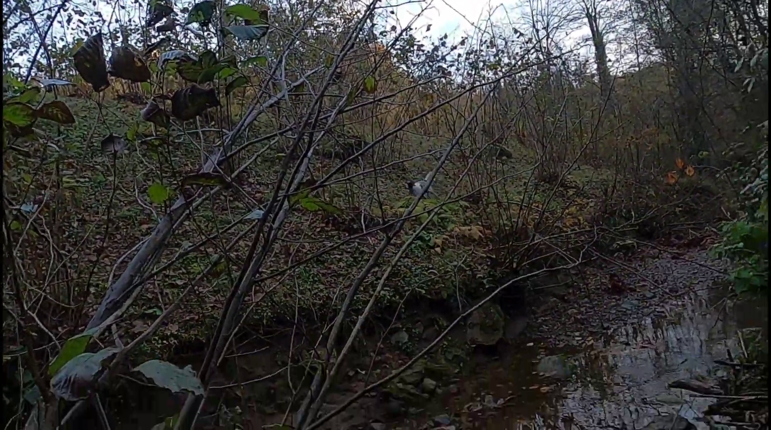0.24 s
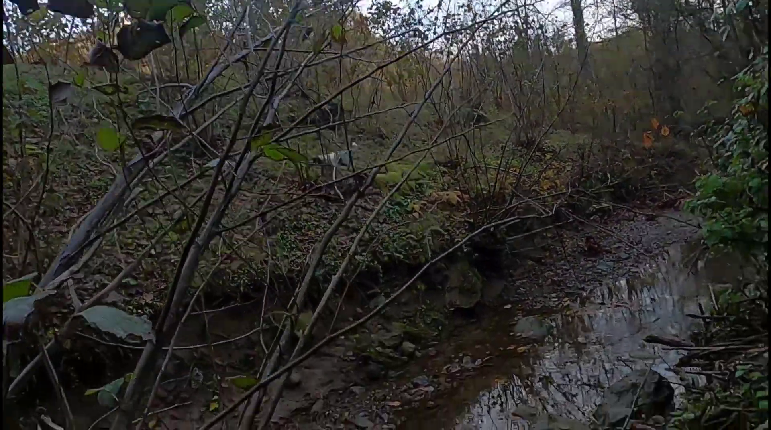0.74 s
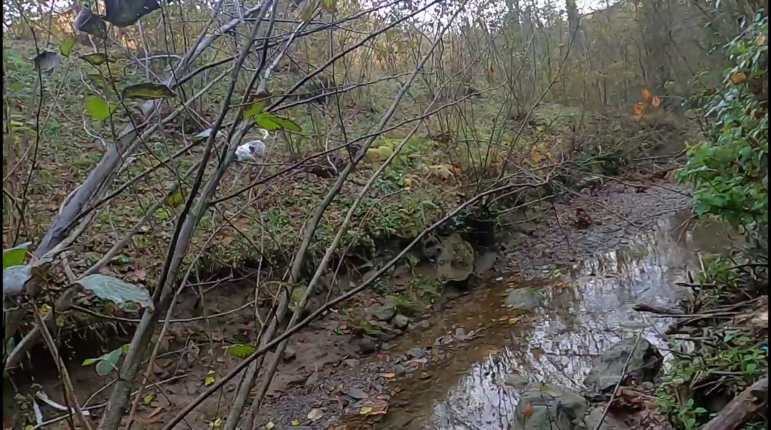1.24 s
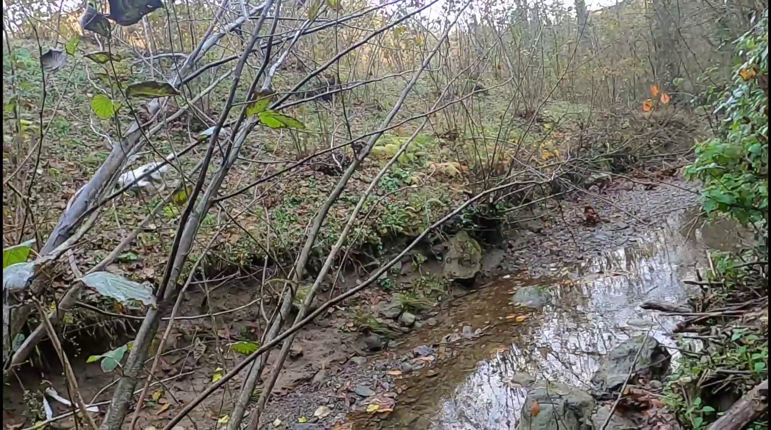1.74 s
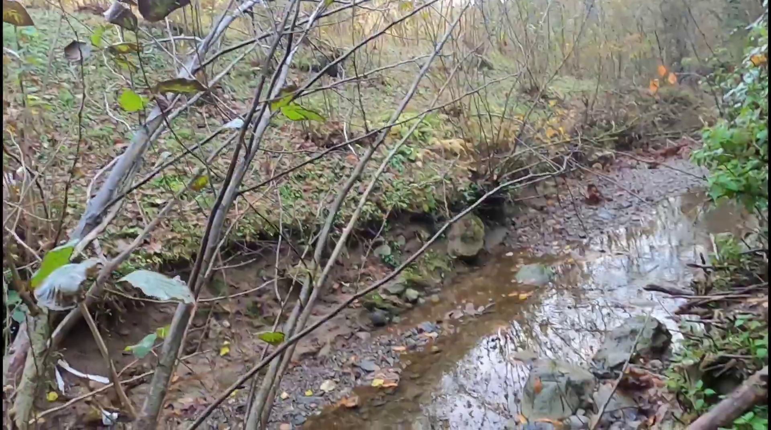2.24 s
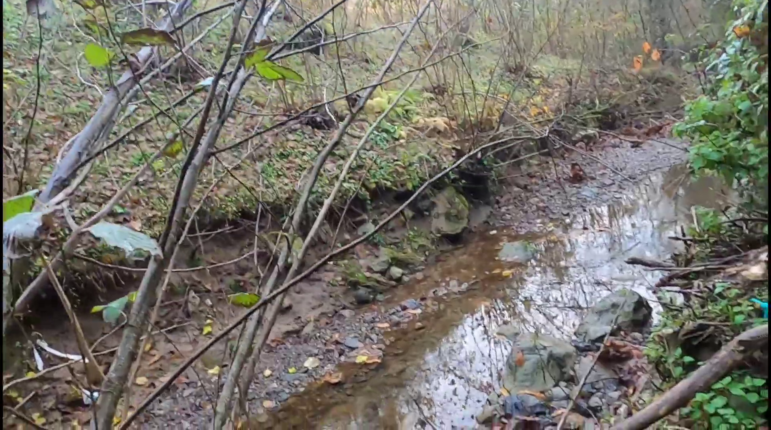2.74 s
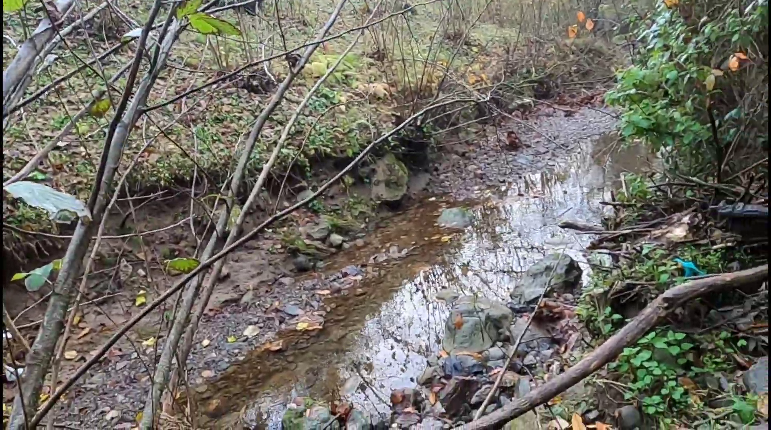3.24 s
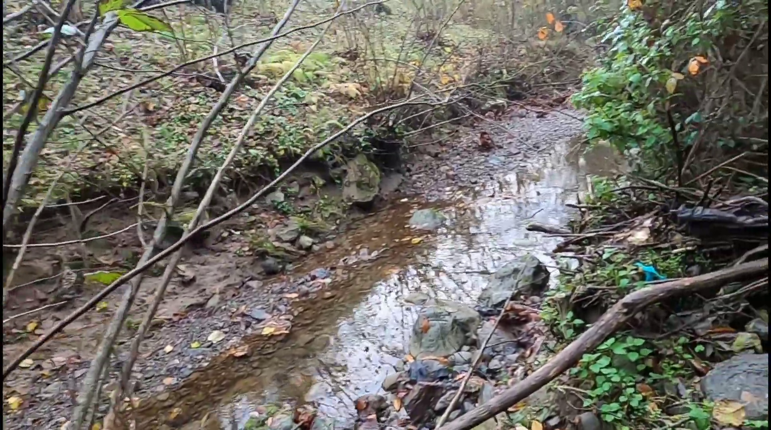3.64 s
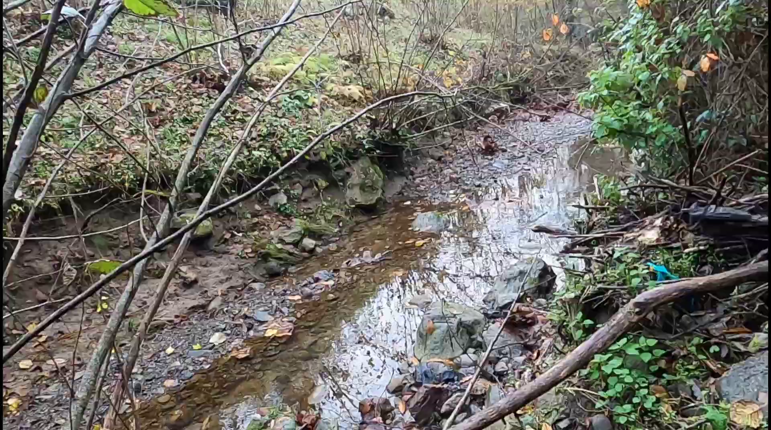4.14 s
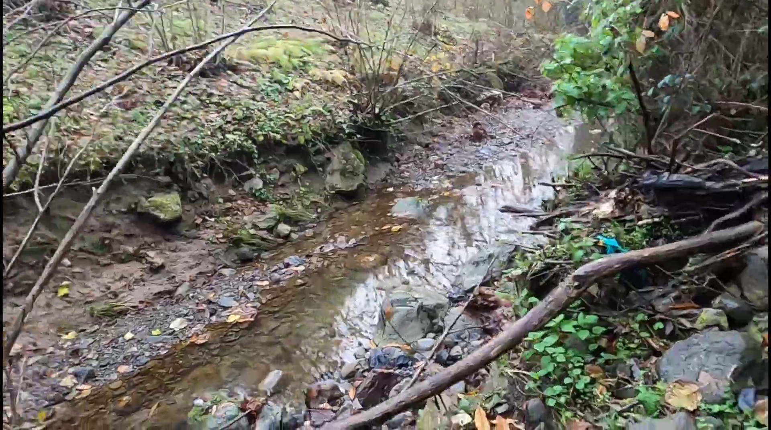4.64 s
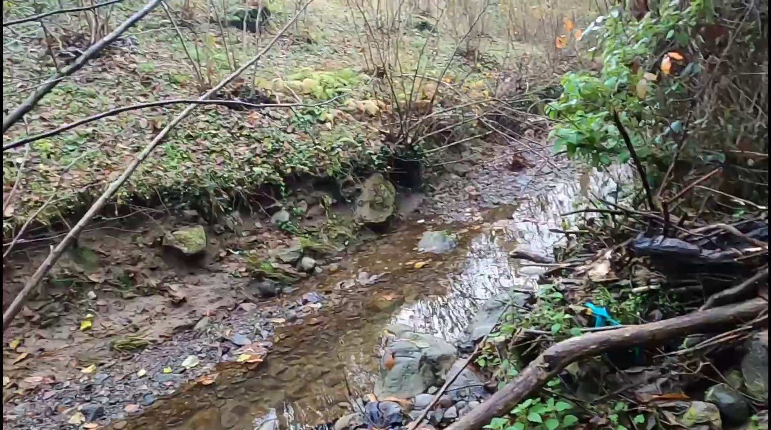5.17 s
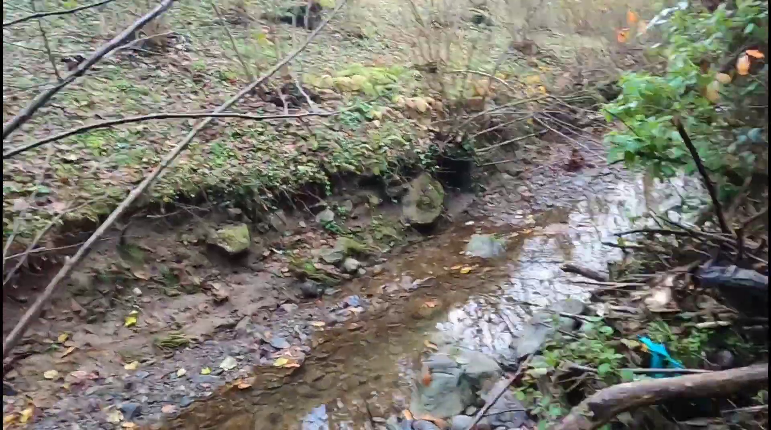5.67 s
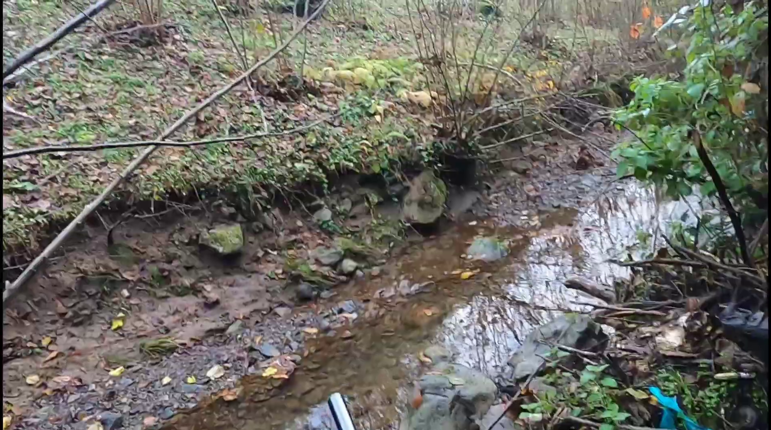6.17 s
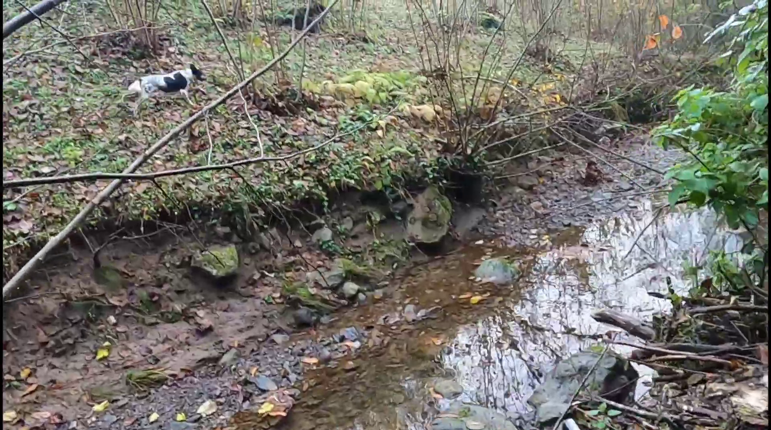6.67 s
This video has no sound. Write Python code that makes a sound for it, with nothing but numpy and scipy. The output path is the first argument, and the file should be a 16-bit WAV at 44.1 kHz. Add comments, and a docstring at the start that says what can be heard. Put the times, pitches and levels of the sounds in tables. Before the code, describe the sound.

In quiet woods, boots break twigs and crush dry leaves right by the microphone. The sharp cracks come in clusters and are thickest around the middle, where a low thump and a microphone jolt land. After that come muffled thuds on soft earth, brushed leaves, a few small snaps and one short woody knock. A soft far-off rustle and low forest murmur lie underneath, with a few very faint peeps.

```python
"""Footsteps in forest undergrowth

Close to a small camera's stereo microphone, twigs snap, dry leaves crush under boots and soles thud on
soft earth. Jolts rumble in the camera body, a metal fitting clinks, leaves swish aside and a hollow
branch is knocked. Farther off are rustling leaves, a low forest murmur and a few faint peeps.
The camera turns its gain down after loud crunches."""
import sys
import numpy as np
from scipy import signal
from scipy.fft import rfft, irfft, next_fast_len
from scipy.io import wavfile
from scipy.ndimage import uniform_filter1d, map_coordinates

SR = 44100
rng = np.random.default_rng(int(sys.argv[2]) if len(sys.argv) > 2 else 0)


def inscribe(sig):
    """Save sig as 16-bit PCM at rate SR to the path in sys.argv[1].

    A 1-D sig is mono; a 2-D sig holds one channel per row.
    Samples are clipped to [-1, 1] before scaling.
    """
    pcm = np.round(np.clip(np.atleast_2d(sig).T, -1, 1) * 32767)
    wavfile.write(sys.argv[1], SR, pcm.astype(np.int16))


N = 304652


def amp(db):
    return 10 ** (np.asarray(db) / 20)


def unit(x):
    return x / np.sqrt(np.mean(x ** 2) + 1e-20)


def along(points, hz):
    """Read (frequency, value) points on a log frequency axis."""
    freqs, values = np.transpose(points)
    return np.interp(np.log(hz + 1), np.log(freqs + 1), values)


def curves(rows):
    """One value per sample for each column after the time."""
    times, *columns = np.transpose(rows)
    return [np.interp(np.arange(N) / SR, times, column) for column in columns]


def wobble(rate):
    """A smooth random curve, rate knots a second."""
    return map_coordinates(rng.standard_normal(int(N * rate / SR) + 4), [np.arange(N) * rate / SR])


def filtered(x, response):
    """x through a complex response of frequency."""
    n = x.shape[-1]
    padded = next_fast_len(n + 4096)
    return irfft(rfft(x, padded) * response(np.fft.rfftfreq(padded, 1 / SR)), padded)[..., :n]


def mode(hz, q):
    """One causal resonance."""
    return lambda f: 1j * f * hz / q / (hz * hz - f * f + 1j * f * hz / q)


def panned(x, db):
    return x * amp([db / 2, -db / 2]).reshape(2, -1)


def unit_peak(x):
    """x scaled so that its envelope tops out at 1."""
    return x / np.sqrt(2 * np.max(uniform_filter1d(x ** 2, size=40)))


def far_noise(spectrum, patchy_db):
    """Distant stereo noise of rms 1, with patches of random gain in time and pitch."""
    # far sound at the microphone: (frequency [Hz], left-right likeness [-1 to 1])
    likeness = [(60, 0.28), (180, 0.95), (540, 0.84), (1630, 0.41), (4900, 0.28), (14700, -0.37)]
    bins = signal.stft(rng.standard_normal((2, N)), nperseg=512)[2]
    patches = uniform_filter1d(uniform_filter1d(rng.standard_normal(bins.shape[1:]), 6, 0), 10, 1)
    pair = signal.istft(bins * amp(patchy_db * unit(patches)), nperseg=512)[1][:, :N]
    width = lambda f: np.arccos(np.clip(along(likeness, f), -1, 1)) / 2
    mid, side = filtered(pair, lambda f: amp(along(spectrum, f)) * [np.cos(width(f)), np.sin(width(f))])
    return unit(np.array([mid + side, mid - side]))


def woods():
    """Far off and to the left, leaves rustle in uneven patches over a low murmur."""
    # the distant forest: (time [s], rustle [dB], murmur [dB], rustle left-right [dB])
    levels = [(0.0, -49.5, -59, 7), (0.45, -44.5, -56.5, 3.5), (0.73, -50, -63, 6.5), (1.0, -47.5, -57, 6),
              (1.33, -51.5, -61.5, 4), (1.61, -47.5, -51, 1.5), (2.27, -50.5, -65, 7.5),
              (2.62, -49.5, -58.5, 6), (3.71, -52, -63.5, 7.5), (4.64, -51, -60.5, 5.5),
              (4.98, -47.5, -46, 5.5), (5.23, -49, -60.5, 6), (5.77, -48.5, -54.5, 5.5),
              (6.4, -44.5, -57, 2.5), (6.91, -44.5, -53, 5)]
    # spectra of rustle and murmur: (frequency [Hz], density [dB])
    rustle_spectrum = [(240, -26.5), (400, -10.5), (495, -13), (830, -7.5), (1030, -3.5), (1550, -5),
                       (2940, -10), (3170, -11.5), (5240, -18.5), (9920, -32), (13000, -44), (15200, -48)]
    murmur_spectrum = [(53, -67), (90, -73), (146, -0.5), (227, 5.5), (324, 3.5), (357, -3.5), (491, 1),
                       (900, -15), (1170, -23), (1980, -120)]
    rustle_db, murmur_db, pan_db = curves(levels)
    stir_db, swell_db = wobble(14) + wobble(70) + wobble(400), 2 * wobble(18)
    rustle = amp(rustle_db + stir_db) * far_noise(rustle_spectrum, patchy_db=1.5)
    murmur = amp(murmur_db + swell_db) * far_noise(murmur_spectrum, patchy_db=0.5)
    return panned(rustle, pan_db) + murmur


def leaf_ticks():
    """Single dry leaves nearby tick faintly at random."""
    ticks_per_s, spread_db = 30, 14
    chance, softness = rng.random((2, N))
    spikes = (chance < ticks_per_s / SR) * amp(-30 - spread_db * softness)
    return filtered(spikes, lambda f: mode(hz=3200, q=1.2)(f) ** 3)


def twig_snaps():
    """A break underfoot is a burst of splinters that rings the twig, spits treble and adds some body."""
    # breaking twigs and leaves: (time [s], ring peak [dB], ring [Hz], treble, body [dB re ring])
    breaks = [(0.052, -18.5, 1400, -29.5, -22), (0.208, -32.5, 1090, -14, -33),
              (0.231, -18.5, 1570, -18, -39.5), (0.263, -34.5, 1130, -13, -19),
              (0.414, -30, 1360, -55, -10), (0.45, -23, 2600, -17, -34), (0.458, -23.5, 1230, -26, -33),
              (0.513, -31.5, 2880, -29, -14), (0.566, -31.5, 3640, -17, -46), (0.6, -17, 3360, -8, -34.5),
              (0.607, -23, 1460, -12, -25), (1.072, -20.5, 1500, -35, -20), (1.098, -17, 2900, -31, -23),
              (1.105, -9.5, 1380, -34, -13.5), (1.123, -4, 2700, -9, -32), (1.136, -14, 2920, 3.5, -13),
              (1.14, -7, 1610, -17, -13.5), (1.152, -16.5, 2970, -5, -12), (1.178, -23, 1960, -16, -11),
              (1.198, -19, 1460, -35, -19), (1.209, -20, 1410, -43, -15), (1.22, -27, 2200, -37, -18),
              (1.317, -31.5, 1390, -29, -22), (1.404, -16.5, 2090, 0.5, -47),
              (1.54, -20.5, 2200, -16.5, -34), (2.576, -7.5, 2180, -6.5, -19), (2.594, -7.5, 2600, -5, -13),
              (2.601, -14.5, 1710, -1.5, -11), (2.644, -10, 2800, -6.5, -43), (2.722, -27, 1730, -27, -34),
              (2.917, -23.5, 2360, -9, -39), (2.973, -26.5, 1560, -45, -16), (3.005, -28.5, 1810, -30, -14),
              (3.037, -26, 2200, -28, -28), (3.042, -7, 2070, -12, -28), (3.065, -27, 2060, -27, -14),
              (3.071, -8.5, 1560, -9, -24), (3.08, -18, 1510, -4, -14), (3.086, -18.5, 2140, -17, -8.5),
              (3.1, -18, 2420, -14, -15), (3.109, -11, 1730, -13, -33), (3.118, -14, 2250, -8, -17),
              (3.143, -6, 2900, -8.5, -58), (3.181, -7, 2620, -6, -17), (3.188, -7, 1400, -38, -26),
              (3.201, -11, 1670, -11, -25), (3.224, -22, 1610, -1, -28), (3.31, -14, 1210, -51, -20),
              (3.34, -8, 2720, -15, -23), (3.352, -5.5, 2320, -4, -14), (3.359, -4, 2030, -16, -27),
              (3.368, -10, 1650, -11, -24), (3.387, -4, 2040, -6, -12.5), (3.397, -9, 1700, -2.5, -21),
              (3.403, -5.5, 2960, -8, -31), (3.416, -2, 1860, -3, -30), (3.421, -2, 1760, -4, -24.5),
              (3.428, -7.5, 1900, -8, -20), (3.457, -16, 1600, -11, -22), (3.47, -20.5, 2590, -6, -32),
              (3.737, -38, 2400, -28, -45), (4.229, -34, 1760, -13, -47), (4.789, -26, 1250, -32, -1.5),
              (4.819, -29.5, 1140, -25, 5), (4.882, -30.5, 1610, -13.5, 1), (5.048, -35, 1470, -23, -1),
              (5.433, -37, 2980, -5, -33), (5.731, -29.5, 960, -35, -10), (5.998, -33, 1560, -8.5, -17),
              (6.054, -33, 2530, -24, -21), (6.07, -36, 1500, -32, -27), (6.123, -25, 3470, -11.5, -13.5),
              (6.218, -23.5, 1160, -60, -9), (6.234, -21, 980, -46.5, 0), (6.351, -30, 1170, -39, 1.5),
              (6.373, -33, 1010, -28, -2), (6.654, -30.5, 1240, -15, -5), (6.695, -37, 3520, 2, -30),
              (6.835, -29, 1590, -34, -5), (6.855, -17.5, 1710, -33, -11.5), (6.87, -31.5, 931, -41, 3.5)]
    out, t = np.zeros((2, N + SR)), np.arange(SR // 10) / SR
    for start, db, hz, treble_db, body_db in breaks:
        t60 = 0.048 * amp(0.12 * body_db + 0.11 * db)  # thick wood and hard breaks last longer
        noise = rng.standard_normal((5, len(t)))
        second_hz = hz * 1.84 ** noise[4, 0]  # every twig has a second mode of its own
        edge_hz = max(5981 + 70 * treble_db, 1.9 * hz)  # damp, dull breaks lose their upper modes
        splinters = amp(3.5 * unit(uniform_filter1d(noise[4], size=30)))  # fibres part unevenly
        fade = amp(-60 * t / t60) + .1 * amp(-60 * t / (4 * t60))
        burst = noise * splinters * (1 - np.exp(-t / .0004)) ** 2 * fade
        burst[:, 6] += amp(7.5 - 0.28 * body_db)  # the first crack, strongest in thin dry twigs
        wood = lambda f: mode(hz, 6.5)(f) - .5 * mode(second_hz, 5.5)(f) + 0.23 * mode(2400, .7)(f)
        damping = lambda f: (1 + .9j * f / edge_hz - (f / edge_hz) ** 2) ** 2
        ring = filtered(burst[0], lambda f: wood(f) * mode(2400, .6)(f) / damping(f))
        spit = burst[1] + 0.5 * burst[2] * [[1], [-1]]  # short waves scatter differently into each port
        treble = filtered(spit * amp(-60 * t / (20 * t60)), lambda f: mode(5600, 1.3)(f) ** 2)
        body = filtered(burst[3], lambda f: mode(480, 1.2)(f) ** 2)
        snap = unit_peak(ring) + amp(treble_db) * unit_peak(treble) + amp(body_db) * unit_peak(body)
        out[:, round(start * SR):][:, :len(t)] += amp(db) * snap
    return out[:, :N]


def leaf_crush():
    """Under a boot, leaves give way in dense clumps of tiny cracks, and thin stalks splinter."""
    # boots on leaf litter: (time [s], length [s], level [dB], treble, stalks [dB re level])
    steps = [(1.104, .13, -42, 1.5, 9.5), (2.422, 0.094, -48, -16, -12), (2.572, 0.09, -44, -7, 2),
             (3.048, .11, -36.5, -5.5, 2), (3.173, 0.14, -44, -4.5, 7.5), (3.334, 0.13, -31, -2, 4.5),
             (4.789, 0.05, -38.5, -17, -6), (4.854, 0.22, -50.5, -12, -1.5), (5.659, 0.14, -47, -12, -5.5),
             (6.18, 0.083, -43, -20, -5), (6.296, 0.12, -45.5, -17, -14), (6.505, 0.046, -45, -10.5, -9),
             (6.804, 0.082, -48, -9.5, -4)]
    # spectra of crushed leaves and of their brittle treble: (frequency [Hz], density [dB])
    litter_spectrum = [(120, -33), (200, -0.5), (437, -9.5), (999, 0), (1120, 2), (2060, -13), (6000, -16),
                       (7800, -51), (13200, -120)]
    crisp_spectrum = [(2060, -13), (3500, -4), (5120, -16), (7270, -4), (12600, -21.5), (15200, -24)]
    land_s, lift_s, settle_db_per_s = 0.016, 0.013, 11  # the litter quiets as it packs down
    grains = amp(4.4 * wobble(500) + 3.03 * wobble(90))
    dull, crisp, side = grains * rng.standard_normal((3, N))
    dull = unit(filtered(dull, lambda f: amp(along(litter_spectrum, f))))
    crisp = unit(filtered(crisp + 0.81 * side * [[1], [-1]], lambda f: amp(along(crisp_spectrum, f))))
    stalks = amp(2.7 * wobble(300) + 4.1 * wobble(70)) * rng.standard_normal(N)
    stalks = unit(filtered(stalks, lambda f: mode(hz=2090, q=1.4)(f) ** 2))
    out, t = np.zeros((2, N)), np.arange(N) / SR
    for start, length, db, treble_db, stalk_db in steps:
        press = np.interp(t - start, [-land_s, 0, length, length + lift_s], [0, 1, 1, 0])
        level = amp(db - settle_db_per_s * np.clip(t - start, 0, 1))
        out += press * level * (dull + amp(treble_db) * crisp + amp(stalk_db) * stalks)
    return out


def camera_jolts():
    """Handling noise: the camera body shakes, and each microphone port feels it partly on its own."""
    # jolts: (time [s], peak [dB], rise [dB/s], fall [dB/s])
    jolts = [(1.13, -36.5, 570, 155), (2.38, -66, 58, 260), (2.6, -57, 290, 230), (3.421, -23.5, 597, 430),
             (4.04, -62, 140, 162), (4.72, -52, 106, 100), (4.86, -31, 228, 88), (5.08, -42.5, 70, 277),
             (5.7, -55.5, 98, 24), (6.27, -42, 249, 110), (6.87, -44.5, 292, 400)]
    # rumble of the camera body: (frequency [Hz], density [dB])
    spectrum = [(8.8, -45), (15, -13), (32, 0.5), (80, -16), (156, -16), (200, -17), (260, -49),
                (440, -120)]
    hand_tremor_db = -83.5
    t = np.arange(N) / SR
    level = amp(hand_tremor_db)
    for at, db, rise, fall in jolts:
        level = level + amp(db - np.where(t < at, rise * (at - t), fall * (t - at)))
    shared, left, right = filtered(rng.standard_normal((3, N)), lambda f: amp(along(spectrum, f)))
    flutter = amp(0.83 * np.array([wobble(11), wobble(51)]))
    return level * flutter * unit(shared + 0.67 * np.array([left, right]))


def sole_thuds():
    """Soft earth below the microphone gives a low push with a short dull puff."""
    # blows on the earth: (time [s], peak [dB], pitch [Hz], t60 [s], left-right [dB])
    blows = [(1.133, -18.5, 404, 0.044, -2), (2.594, -16, 145, 0.032, -1.5), (3.424, -10, 130, 0.042, -10),
             (4.784, -20, 245, 0.012, -1), (4.811, -27.5, 127, 0.033, -1.1), (4.833, -12, 31.6, 0.17, 2),
             (4.883, -14.5, 72.5, 0.06, -9), (5.079, -35, 52.4, 0.1, 20), (5.687, -30, 172, 0.12, 2),
             (5.721, -26.5, 466, 0.065, -2), (6.23, -21, 191, 0.096, -1), (6.344, -27.5, 185, 0.11, 1),
             (6.868, -27.5, 417, 0.037, 0)]
    out, t = np.zeros((2, N + SR)), np.arange(SR // 4) / SR
    for start, db, hz, t60, pan_db in blows:
        fade = amp(-60 * t / t60) * (1 - np.exp(-t / 0.0039))
        noise = rng.standard_normal((2, len(t))) + 2.2 * rng.standard_normal(len(t))
        puff = filtered(noise * fade, lambda f: mode(hz, .8)(f) ** 2)
        push = np.sin(2 * np.pi * hz * t) * fade
        thud = push / push.max() + 1.63 * puff / np.abs(puff).max()
        out[:, round(start * SR):][:, :len(t)] += panned(amp(db) * thud / np.abs(thud).max(), pan_db)
    return out[:, :N]


def metal_clink(start=1.138, hz=8030, db=-46, t60=.45):
    """A small metal part is jogged and rings with one thin tone."""
    t = np.arange(N) / SR
    return (t > start) * amp(db - 60 * np.abs(t - start) / t60) * np.sin(2 * np.pi * hz * t)


def peeps():
    """Faint, slightly wavering tones, perhaps far birds."""
    # peeps: (centre time [s], half length [s], pitch [Hz], level [dB])
    notes = [(1.706, 0.071, 2940, -56), (1.813, .04, 3030, -58), (5.28, 0.016, 5960, -61),
             (5.672, 0.019, 6030, -70), (5.82, .03, 6030, -62)]
    t = np.arange(N) / SR
    waver = 2 * np.pi * np.cumsum(25 * wobble(30)) / SR
    return sum(amp(db) * np.exp(-((t - at) / half) ** 2) * np.sin(2 * np.pi * hz * t + waver)
               for at, half, hz, db in notes)


def leaf_swishes():
    """Leaves brushed aside hiss softly in a broad band."""
    # brushes: (centre time [s], half length [s], band centre [Hz], level [dB])
    brushes = [(2.1, 0.035, 5500, -64), (5.697, 0.016, 1270, -59), (4.807, 0.011, 2600, -35),
               (4.981, .035, 3900, -43), (5.05, 0.039, 4700, -50), (6.196, 0.008, 5200, -43.5)]
    t = np.arange(N) / SR
    hiss = lambda hz: unit(filtered(rng.standard_normal((2, N)), lambda f: mode(hz, 2.4)(f) ** 2))
    return sum(amp(db + 0.69 * wobble(220)) * np.exp(-((t - at) / half) ** 2) * hiss(hz)
               for at, half, hz, db in brushes)


def branch_knock():
    """A hollow branch close by answers a knock with two short modes; rough bark makes the blow uneven."""
    # the two contacts of the knock: (time [s], peak [dB])
    contacts = [(6.301, -26), (6.316, -14.5)]
    # modes of the branch: (frequency [Hz], level [dB], t60 [s])
    modes = [(836, -1, 0.022), (1690, -9, 0.018)]
    out, t = np.zeros(N + SR), np.arange(SR // 8) / SR
    attack = (1 - np.exp(-t / .0012)) ** 2
    for start, db in contacts:
        ring = sum(amp(level + rng.normal(0, 1.8) - 60 * t / t60) * np.sin(2 * np.pi * hz * t)
                   for hz, level, t60 in modes)
        bark = amp(0.81 * unit(uniform_filter1d(rng.standard_normal(len(t)), size=60)))
        out[round(start * SR):][:len(t)] += amp(db) * unit_peak(ring * bark * attack)
    return out[:N]


def microphone_ports(x):
    """Near sounds are shaded by the camera body, and their treble reaches the right port first."""
    # shading: (frequency [Hz], left-right [dB])
    shadow = [(60, -5), (200, -2), (600, .5), (2300, 1.5), (4500, -.5), (8000, -4), (14000, -8)]
    # phase between the ports: (frequency [Hz], lead of the left [rad])
    lead = [(0, 0.29), (3500, -1.35), (5000, -1.48), (8500, -0.73), (13000, -1.9)]
    hz, radians = np.transpose(lead)
    sides = np.array([[.5], [-.5]])
    phase = lambda f: np.exp(1j * sides * np.interp(f, hz, radians))
    return filtered(x, lambda f: amp(sides * along(shadow, f)) * phase(f))


def echo(x, decay):
    """Scattered sound; each frequency dies at its own speed."""
    hz, t, bins = signal.stft(rng.standard_normal((2, SR // 2)), SR, nperseg=256)
    tail = signal.istft(bins * amp(-60 * t / along(decay, hz)[:, None]), SR, nperseg=256)[1]
    return signal.fftconvolve(x, tail / np.linalg.norm(tail[0]), axes=1)[:, :N]


def gain_control(x, threshold_db=-42.5, cut_db_per_db=0.79, memory_s=0.62, above_hz=300):
    """Loudness over the threshold builds up in a slow memory that turns the camera's gain down."""
    heard = filtered(x.mean(0), lambda f: f > above_hz)
    level_db = 10 * np.log10(np.abs(uniform_filter1d(heard ** 2, size=SR // 50)) + 1e-12)
    hold = np.exp(-1 / (memory_s * SR))
    excess_db = signal.lfilter([1 - hold], [1, -hold], np.maximum(level_db - threshold_db, 0))
    return x * amp(-cut_db_per_db * excess_db)


def scene():
    """Feet close to the microphone, the woods all around."""
    # early scatter off ground and stems, late echo among the trunks: (frequency [Hz], t60 [s])
    ground_decay = [(300, 0.16), (2000, 0.11), (10000, 0.06)]
    trunk_decay = [(300, 0.26), (2000, 0.62), (7000, 0.77), (13000, 0.57)]
    feet = twig_snaps() + leaf_crush() + branch_knock() + leaf_ticks()
    echoes = amp(-20) * echo(feet, ground_decay) + amp(-22) * echo(feet, trunk_decay)
    near = microphone_ports(feet) + leaf_swishes() + sole_thuds() + camera_jolts() + metal_clink()
    return near + echoes + woods() + peeps()


def record(dry):
    """The gain ducks after loud sounds; the treble fades and stops at the camera's band limit."""
    rolloff_hz, limit_hz = 13300, 15500
    return filtered(gain_control(dry), lambda f: (f < limit_hz) / np.sqrt(1 + (f / rolloff_hz) ** 20))


dry = scene()
out = record(dry)
inscribe(out)
```